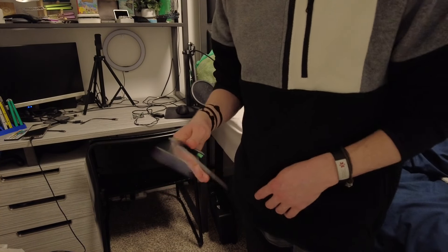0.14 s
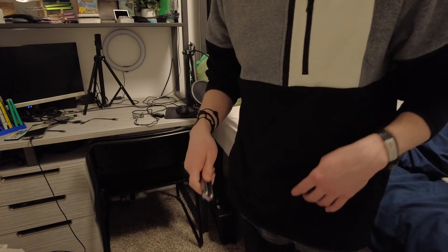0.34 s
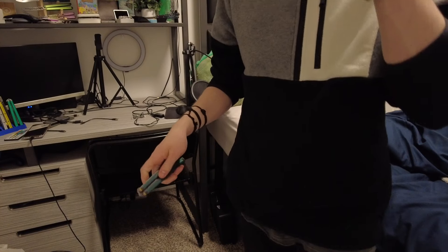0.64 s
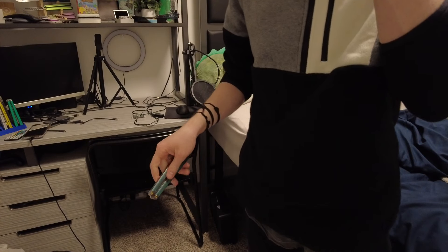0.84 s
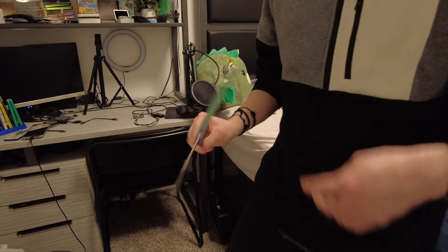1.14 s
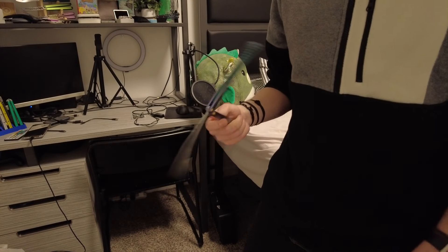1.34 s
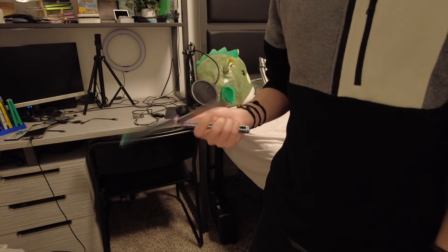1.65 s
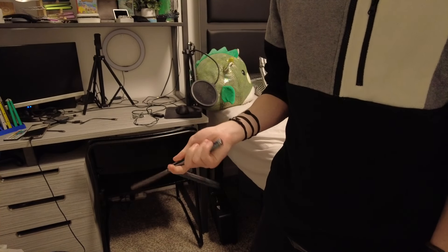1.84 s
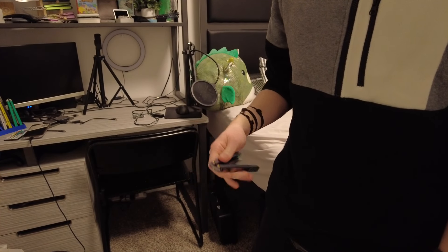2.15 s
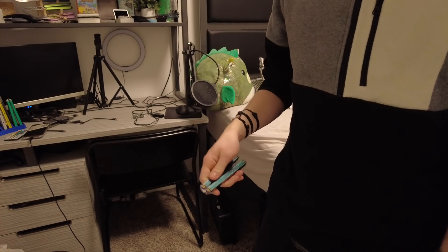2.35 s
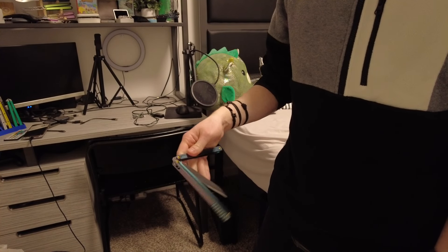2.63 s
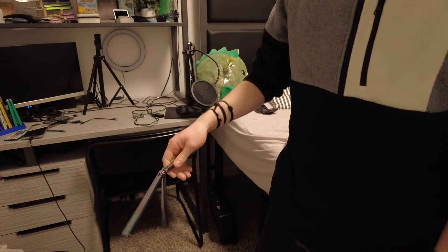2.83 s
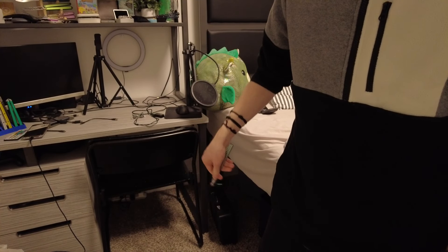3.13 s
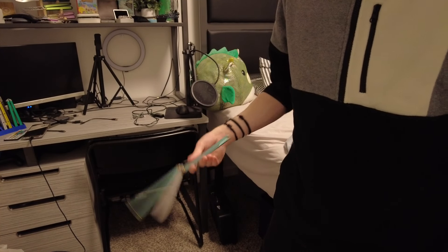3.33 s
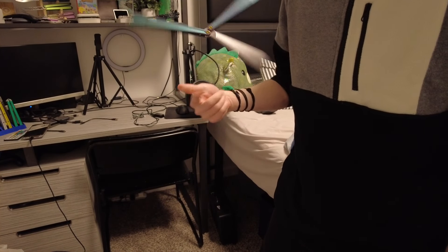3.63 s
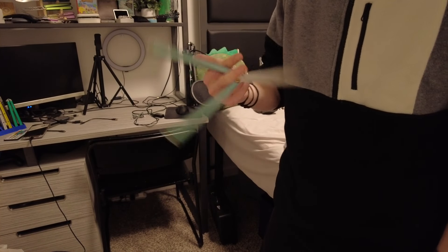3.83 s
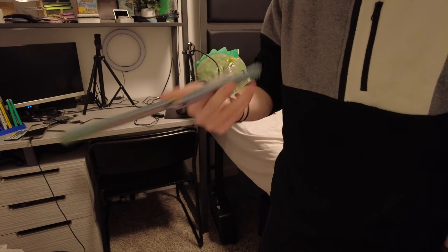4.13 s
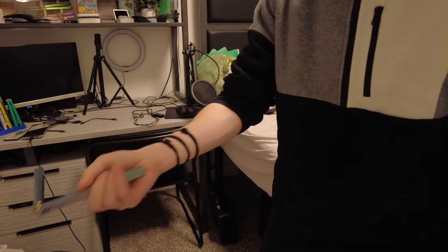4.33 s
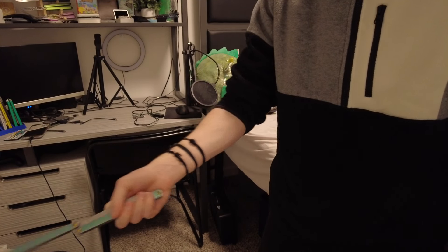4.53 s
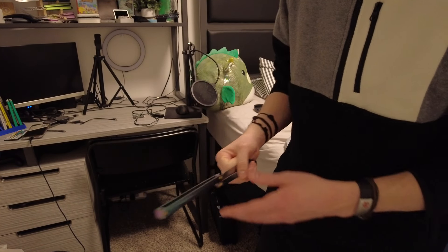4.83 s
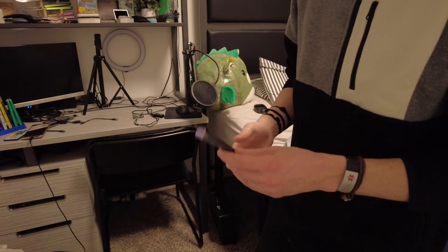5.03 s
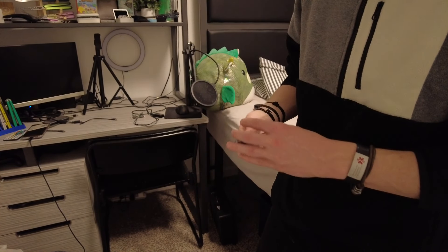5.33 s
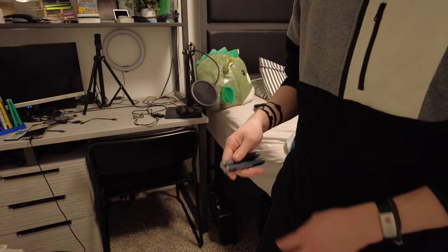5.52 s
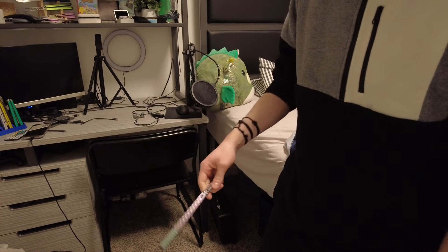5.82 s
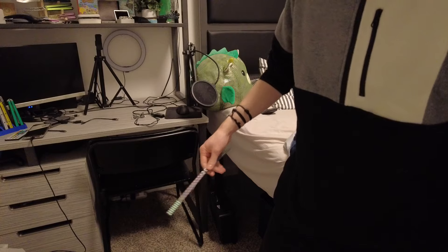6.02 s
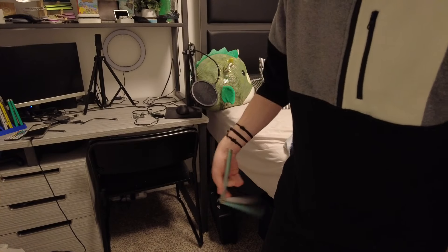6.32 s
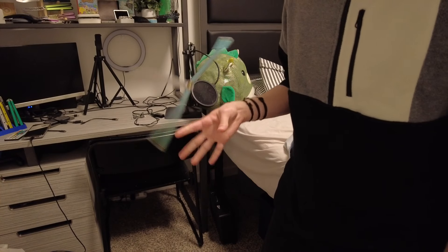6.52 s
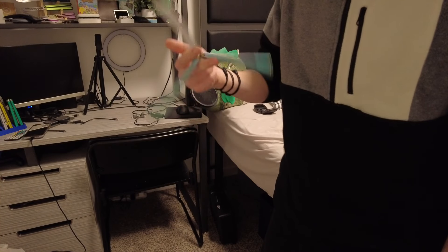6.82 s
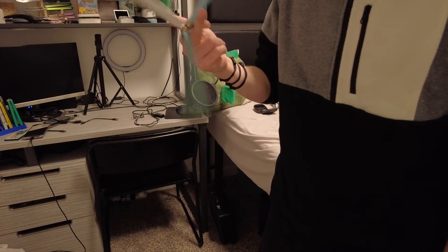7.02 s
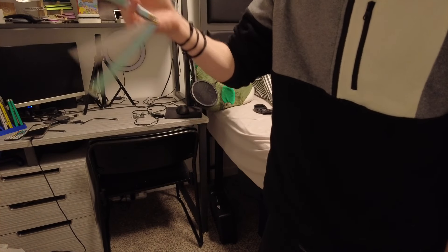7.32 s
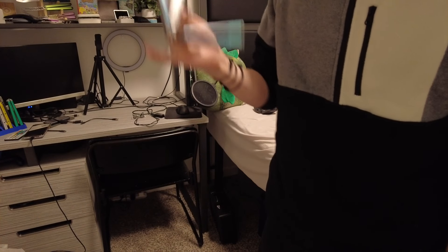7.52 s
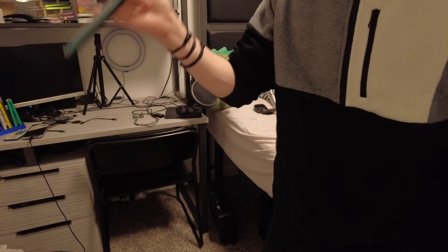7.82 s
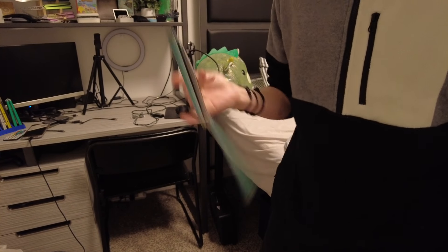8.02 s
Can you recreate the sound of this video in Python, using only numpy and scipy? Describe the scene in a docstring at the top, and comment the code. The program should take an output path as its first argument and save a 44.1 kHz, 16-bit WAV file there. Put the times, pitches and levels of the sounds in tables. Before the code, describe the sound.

Sharp, dry metallic clacks open at once, then scattered clinks, tiny chatters and dull palm pats over faint room rumble and sleeve rustle.

```python
"""A hard metal clack comes at once, over rustling sleeves and the low rumble and hum of a house.
A butterfly knife is flipped by hand in a small, quiet bedroom, close to a camera.
Its handles clack on each other and on the blade: a dry noise click plus decaying sine modes.
Loose handles chatter in bursts of small contacts, and soft pats in the hand are filtered noise.
Rustle, rumble, hum and hiss are shaped noise; random echoes give the knife its room."""
import sys
import numpy as np
from scipy import signal
from scipy.fft import rfft, irfft, next_fast_len
from scipy.io import wavfile
from scipy.ndimage import map_coordinates

SR = 44100
rng = np.random.default_rng(int(sys.argv[2]) if len(sys.argv) > 2 else 0)


def master(y):
    """Save y as 16-bit WAV."""
    cut = np.clip(np.atleast_2d(y).T, -1, 1)
    pcm = np.round(cut * 32767)  # scale
    wavfile.write(sys.argv[1], SR, pcm.astype(np.int16))


N = 359856

# A handle hits its mate: start_s [s], level_db [dB], grip of the hand [0-1], spot along the handle
# [about -1 to 1, 0 is the middle], ring_share [ring time as a share of the free ring]
HANDLE_HITS = [(.004, -25.5, 0.73, 0.041, 0.079), (.031, -38, 0.55, -.45, 0.21), (.052, -42, 0.63, 0, 0.25),
               (0.2605, -39.5, 0.8, -.6, .35), (0.3252, -43, 0.7, 0.8, 1.1), (0.3307, -37, 0.8, .3, 0.27),
               (1.253, -51.5, 0.02, 0.33, 0.56), (1.3644, -44.5, 0.13, -0.2, 0.29),
               (1.579, -59.5, 0.32, -.1, 0.3), (1.609, -59, 0.74, -1.4, 0.52),
               (1.8484, -34, 0.51, -1.2, 0.4), (1.872, -37.5, 0.5, -0.62, 0.3),
               (1.8858, -41, 0.37, 0.099, 0.046), (2.2073, -34.5, 0.5, 0.32, 0.53),
               (2.219, -39, 1, .8, 0.2), (3.9299, -41.5, 0.1, -0.59, 0.81), (3.954, -51, 0, -0.11, 1.3),
               (3.9697, -44.5, 0.6, -0.22, 0.98), (4.6136, -40.5, 0.23, 0.93, 0.52),
               (4.7328, -60.5, .7, 0.26, .8), (5.334, -40.5, 0.61, -.9, 0.46), (6.342, -46, 0.71, 0, 0.35),
               (7.372, -41.5, 0.4, 0.032, 1.04), (7.618, -44, .45, 0.012, 1.15),
               (7.777, -52.5, 0.45, .2, 2.6)]
# A handle hits the blade: start_s [s], level_db [dB], grip [0-1], spot [-1 to 1], ring_share [share]
BLADE_HITS = [(2.162, -38.5, 0.82, .5, 0.23), (3.7892, -65.5, 0, -.6, 0.17),
              (4.2481, -52.5, 0.44, 0.085, 1.3), (4.2664, -45.5, 0.8, -0.35, 0.14),
              (4.322, -54.5, 0.45, 0.16, 0.51), (8.107, -37, 0.4, -0.65, 1.1)]


def amp(db):
    """Turn decibels into a gain."""
    return np.exp(np.asarray(db) * (np.log(10) / 20))


def unit(x):
    """Scale a sound to an rms of 1."""
    return x / np.sqrt(np.mean(x ** 2) + 1e-20)


def along(points, hz):
    """Read a curve of (Hz, value) points on a log frequency axis."""
    f, v = np.transpose(points)
    return np.interp(np.log(hz + 1), np.log(f + 1), v)


def curve(rows):
    """Join (s, value) rows by straight lines, one value per sample."""
    return np.interp(np.arange(N) / SR, *np.transpose(rows))


def wobble(rate):
    """A smooth random curve with rate knots a second."""
    knots = rng.standard_normal(int(N * rate / SR) + 4)
    return map_coordinates(knots, [np.arange(N) * rate / SR])


def filtered(x, response):
    """Multiply the spectrum of x by a response of frequency."""
    n = x.shape[-1]
    m = next_fast_len(n + 2048)  # padded so that the end does not wrap onto the start
    return irfft(rfft(x, m) * response(np.fft.rfftfreq(m, 1 / SR)), m)[..., :n]


def noise(gain):
    """Diffuse stereo noise of rms 1: left and right are nearly the same in the bass."""
    # pitch_hz [Hz], likeness of left and right [0-1]
    likeness = [(40, 1), (120, 0.92), (250, 0.81), (600, 0.095), (3000, 0.22)]

    def mid_and_side(hz):
        turn = np.arccos(np.clip(along(likeness, hz), -1, 1)) / 2
        return gain(hz) * np.array([np.cos(turn), np.sin(turn)])

    mid, side = filtered(rng.standard_normal((2, N)), mid_and_side)
    return unit(np.array([mid + side, mid - side]))


def add(track, s, sound):
    """Mix a sound into the track at time s."""
    i = max(round(s * SR), 0)
    part = sound[..., :max(N - i, 0)]
    track[..., i:i + part.shape[-1]] += part


def house(air_db=-56, hum_db=-1, lumpy_db=3.0):
    """Room air, uneven rumble, a hum in the room's low resonances and a faint hiss, all from noise."""
    # background air: pitch_hz [Hz], level_db [dB per Hz]
    air_colour = [(15, -0.5), (45, 0), (85, -13), (250, -25), (400, -34.5), (1000, -50), (3200, -51.5),
                  (4700, -45), (11000, -54), (16000, -65.5)]
    # rumble and hum bands: centre_hz [Hz], width_hz [Hz], level_db [dB, before lumps or swell]
    hum_bands = [(32.3, 7.2, -52.5), (59.5, 5.3, -62.5), (122.5, 10, -74.5), (190, 20, -74),
                 (228, 7.6, -73)]
    # faint hiss: time_s [s], level_db [dB]
    hiss_level = [(0, -76), (1.1, -71), (2.9, -84.5), (3.7, -85.5), (4.2, -73.5), (6, -83.5), (8.15, -73.5)]
    swell_s, swell_width_s, swell_db = 5.9, 0.88, 5.5  # the upper hum swells once
    out = amp(air_db) * noise(lambda hz: amp(along(air_colour, hz)))
    bump = np.exp(-((np.arange(N) / SR - swell_s) / swell_width_s) ** 2)
    swell = amp(hum_db + swell_db * bump)
    lumps = amp(lumpy_db * wobble(4.4)) * amp([[1.5], [-1.5]])  # louder on the left
    for centre, width, db in hum_bands:
        band = noise(lambda hz: 1 / (1 + ((hz - centre) / width) ** 2))
        out += amp(db) * band * (lumps if centre < 100 else swell)
    hiss_colour = [(1300, 3), (3000, -1.5), (8000, -12), (15000, -18.0)]  # (Hz, dB)
    hiss = noise(lambda hz: amp(along(hiss_colour, hz)))
    return out + amp(curve(hiss_level)) * hiss


def sleeves(rustle_db=-2):
    """Cloth rubs softly as the arms move: noise with a slowly changing, wobbling level."""
    # time_s [s], level_db [dB, before rustle_db and the wobble]
    rustle_level = [(0.0, -66), (0.32, -64), (1.29, -73), (2.13, -69.5), (2.54, -71.5), (2.86, -76),
                    (6.18, -67.5), (6.57, -70), (8.16, -71.5)]
    # pitch_hz [Hz], level_db [dB per Hz]
    cloth_colour = [(80, -13.5), (250, 1.5), (550, -2.5), (900, -12), (2000, -16), (5000, -23.5),
                    (15000, -39)]
    level_db = curve(rustle_level) + rustle_db + 1.8 * wobble(11)
    return amp(level_db) * noise(lambda hz: amp(along(cloth_colour, hz)))


def strike(click_db, bend_db, ring, blade, detune=.004, snap_db=5, snap_t60=0.029, click_t60=0.018,
           click_gain_db=15, ring_db=-1.57, spread=0.83, press=0.00086):
    """One contact: a dry click, then bending modes that lose much energy while the parts still touch."""
    # centres of the four bending ranges: pitch_hz [Hz]
    bend_hz = [1270, 2000, 4000, 5800]
    # ringing modes of the handles: pitch_hz [Hz], level_db [dB], t60_s [s to fall 60 dB, free ring]
    handle_modes = [(1266, -10.5, .08), (1273, 0.5, 0.19), (1915, -5, .15), (2016.4, -4.5, .2),
                    (2560, -14, 0.15), (3816, -5, .04), (4047, -4, 0.056), (4290, -8, 0.031),
                    (5600, -4.5, 0.23), (5800, -6, 0.034), (6080, -12, 0.043), (6190, -11.5, 0.025),
                    (6720, -18, 0.053), (9047, -15.5, .06), (10840, -22, 0.086)]
    # ringing modes of the blade: pitch_hz [Hz], level_db [dB], t60_s [s, free ring]
    blade_modes = [(1263.7, 1.5, .14), (2133, -2.5, .14), (2180, -6, 0.073), (2550, -6, 0.057),
                   (3580, -8.5, .16), (3890, -3.5, 0.095), (4360, -9.5, 0.025), (5640, -2, .1),
                   (6000, -3, .05), (9500, -17, .06)]
    # colour of the dry click: pitch_hz [Hz], level_db [dB]
    click_colour = [(150, -12.5), (760, -5.5), (1120, -7.5), (1550, -4), (2400, 3), (3100, -3.5), (4300, 2),
                    (5200, -2.5), (6400, -1.5), (9400, -4), (11700, -16.5), (14500, -7.5), (16000, -11)]
    t = np.arange(SR // 6) / SR
    blade, ring = np.clip(blade, 0, 1), max(ring, .05)
    hz, db, t60 = np.transpose(handle_modes + blade_modes)
    share = np.sqrt([1 - blade] * len(handle_modes) + [blade] * len(blade_modes))
    mode_db = db + np.interp(np.log(hz), np.log(bend_hz), bend_db) + rng.normal(0, 1, len(hz))
    size = share * amp(mode_db)
    hz = hz * (1 + rng.normal(0, detune, len(hz)))  # grip and opening angle shift each mode
    rise = 1 - np.exp(-t / press)  # the contact takes a moment to close

    long_ring = amp(-60 * t / (t60[:, None] * ring))
    snap = amp(snap_db - 60 * t / (snap_t60 * ring))  # quick loss while the parts touch
    fade = rise * (long_ring + snap)
    # level each mode by its first hundredth of a second
    fade *= size[:, None] / np.sqrt(np.mean(fade[:, :SR // 100] ** 2, axis=1, keepdims=True))
    apart = spread * hz / bend_hz[-1]  # short waves reach the two ports further out of step
    phase = rng.uniform(0, 2 * np.pi, len(hz)) + apart * rng.standard_normal((2, len(hz)))
    angle = np.float32(2 * np.pi * hz[:, None] * t)
    modes = np.cos(phase) @ (fade * np.sin(angle)) + np.sin(phase) @ (fade * np.cos(angle))

    grit = rng.standard_normal(len(t)) + rng.standard_normal((2, len(t)))  # shared part + own part
    click = unit(filtered(grit, lambda f: amp(along(click_colour, f))))
    click *= amp(click_db + click_gain_db - 60 * t / click_t60)
    return amp(ring_db) * modes + rise * click


def bedroom(sound, wet_db=-1.5, build=0.0013, early_db=2, early_t60=0.16, apart_hz=2600, soak_db=-2.0):
    """Add a quick answer from desk and walls and a short tail, new for each position of the knife."""
    # pitch_hz [Hz], t60_s [s to fall 60 dB]
    wall_fade = [(200, 0.81), (800, 0.31), (2000, .29), (5500, 0.33), (15000, 0.088)]
    hz, t, (mid, side) = signal.stft(rng.standard_normal((2, SR // 3)), SR, nperseg=256)
    # close ports hear the low echoes alike
    turn = np.pi / 4 * np.minimum(hz[:, None] / apart_hz + 0.15, 1)
    left = mid * np.cos(turn) + side * np.sin(turn)
    right = mid * np.cos(turn) - side * np.sin(turn)
    fade = amp(-60 * t / along(wall_fade, hz)[:, None]) + amp(early_db - 60 * t / early_t60)
    fade *= amp(soak_db * np.exp(-hz[:, None] / apart_hz))  # bed and carpet soak up part of the lower ring
    tail = signal.istft(np.array([left, right]) * fade, SR, nperseg=256)[1]
    tail *= 1 - np.exp(-np.arange(tail.shape[1]) / SR / build)
    tail *= amp(wet_db) / np.linalg.norm(tail[0])
    tail[:, 0] += 1  # the direct path
    return signal.fftconvolve(sound, tail, axes=1)


def clack(db, grip, spot, ring, blade):
    """One blow: the hand's grip and the spot that is struck decide which bending ranges ring."""
    # Each table lists level_db [dB] for the four bending ranges, low to high.
    # a loose handle struck at its middle
    free_db = [8, 3.5, 2.6, 3.5]
    # change under a full grip: fingers muffle the slow bending
    grip_db = [-31, -10.5, -0.8, -0.03]
    # change towards one end: neighbouring ranges trade strength
    spot_db = [-1, -2.5, -4, 9]
    # change towards either end, where the second range has its nodes
    end_db = [0.86, -6, 0.2, -0.5]
    # change when the blade takes the blow
    blade_db = [-3, 3.5, -0.5, -1.5]
    weights = np.array([1, grip, spot, spot ** 2, blade])
    bend_db = db + weights @ np.array([free_db, grip_db, spot_db, end_db, blade_db])
    # what damps the ring smothers the click too: 2 dB for each halving of the ring time
    click_db = db - 5 + 1.5 * spot + 2 * np.log2(max(ring, .05))
    return strike(click_db, bend_db, ring, blade)


def clacks():
    """Each swing ends with a handle hitting its mate or the blade."""
    out = np.zeros((2, N))
    # the second number is the share of the ring that is the blade's
    for rows, blade in (HANDLE_HITS, 0.058), (BLADE_HITS, .88):
        for s, db, grip, spot, ring in rows:
            add(out, s, bedroom(clack(db, grip, spot, ring, blade)))
    return out


def grip_at(s):
    """The hand keeps the grip that it had at the latest clack."""
    return max((when, grip) for when, _, grip, _, _ in HANDLE_HITS + BLADE_HITS if when <= s)[1]


def chatter(rate=240, bend_db=(-1, 1, 4, 5), click_db=-6.0, ring=0.67, blade=.2, detune=.007):
    """After a clack the loose handles bounce on their pivots in quick, uneven little contacts."""
    # start_s [s], length_s [s], level_db [dB]
    bursts = [(0.337, .08, -53.5), (1.61, .023, -66), (1.883, .028, -51), (2.227, .09, -45),
              (3.976, .02, -54.5), (4.619, .009, -44.5), (7.65, .055, -54), (7.792, .028, -57.5),
              (8.104, 0.034, -50.5)]
    out = np.zeros((2, N))
    for s, length, db in bursts:
        low_db = 4.5 - 22 * grip_at(s)  # low ring when loose, and its loss under a full grip
        burst = np.zeros((2, SR // 3))
        count = max(round(length * rate), 1)
        # the hand damps the slowest bending most
        colour = np.array(bend_db) + low_db * np.array([1, 0.56, 0.39, 0.37])
        # one contact at a random moment in each equal slot
        times = (np.arange(count) + rng.random(count)) / count * min(length, .1)
        for when in times:
            contact = strike(db + click_db, db + colour, ring * amp(low_db / 2), blade, detune)
            add(burst, when, contact)
        add(out, s, bedroom(burst))
    return out


def pats(rise=0.0041):
    """The knife lands softly in palm and fingers: metal on skin gives a dull puff with no ring."""
    # start_s [s], level_db [dB]
    landings = [(1.85, -60.5), (2.163, -52), (2.21, -52), (2.27, -53), (4.132, -68.5), (5.335, -53.5)]
    # pitch_hz [Hz], level_db [dB]
    palm_colour = [(80, -12), (220, -2), (430, 1), (700, -7), (1500, -23.5), (6000, -37.5)]
    out, t = np.zeros((2, N)), np.arange(SR // 10) / SR
    shape = t / rise * np.exp(1 - t / rise)  # peaks after rise seconds, then dies away
    for s, db in landings:
        puff = unit(filtered(rng.standard_normal(len(t)), lambda hz: amp(along(palm_colour, hz))))
        add(out, s, bedroom(np.tile(amp(db) * puff * shape, (2, 1))))
    return out


def scene():
    """The knife and the arms are a little left of centre, over the sound of the house."""
    knife_and_arms = clacks() + chatter() + pats() + sleeves()
    return knife_and_arms * amp([[.4], [-.4]]) + house()


def record(dry):
    """The camera keeps nothing above its band limit of 16200 Hz."""
    return filtered(dry, lambda hz: hz < 16200)


dry = scene()
out = record(dry)
master(out)
```